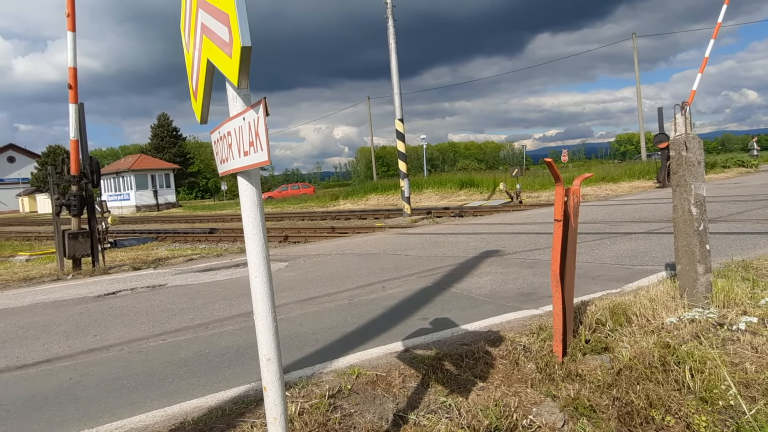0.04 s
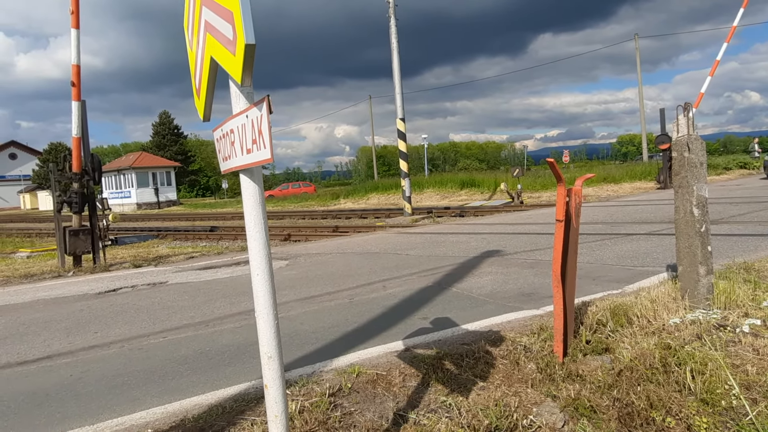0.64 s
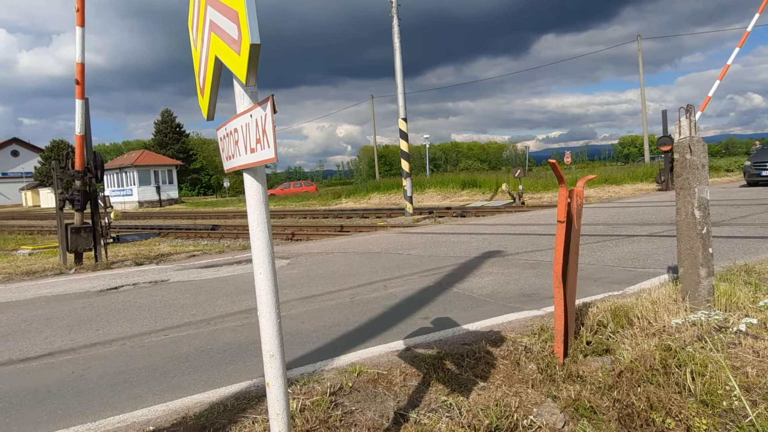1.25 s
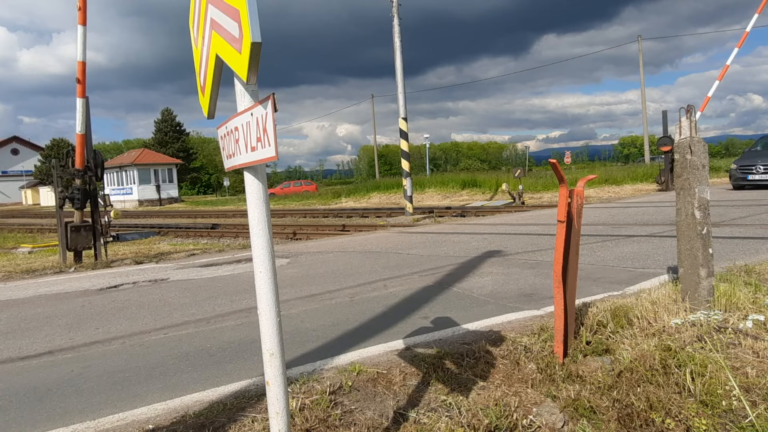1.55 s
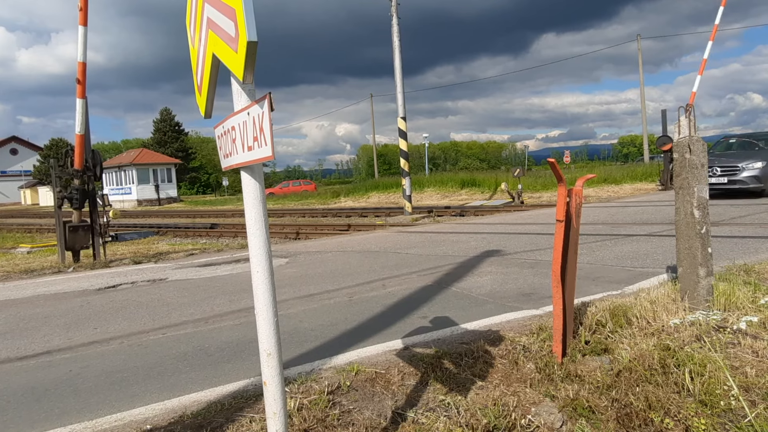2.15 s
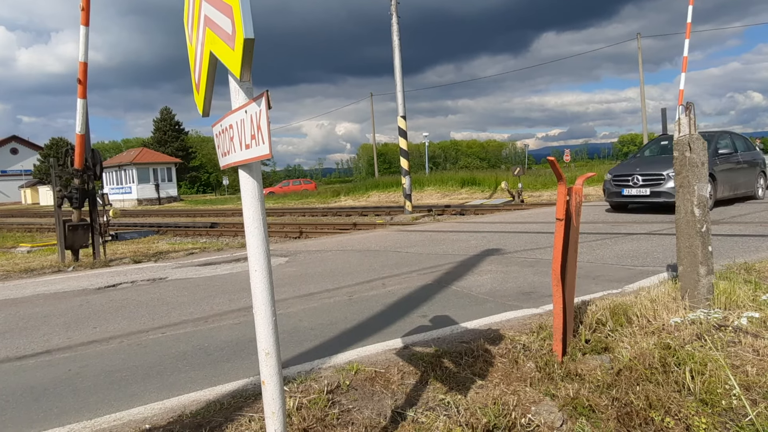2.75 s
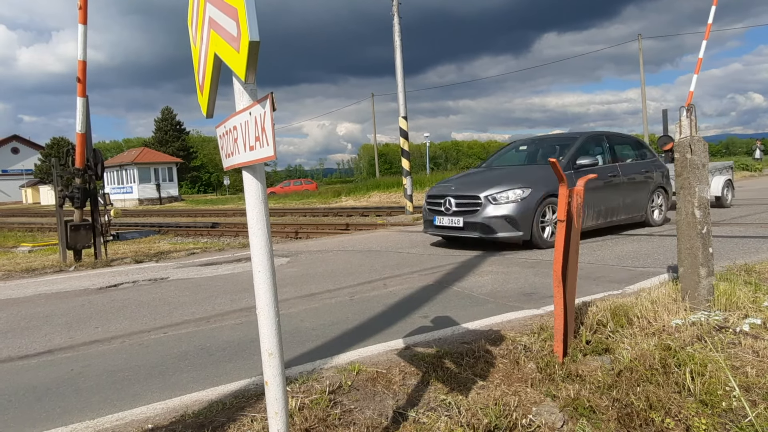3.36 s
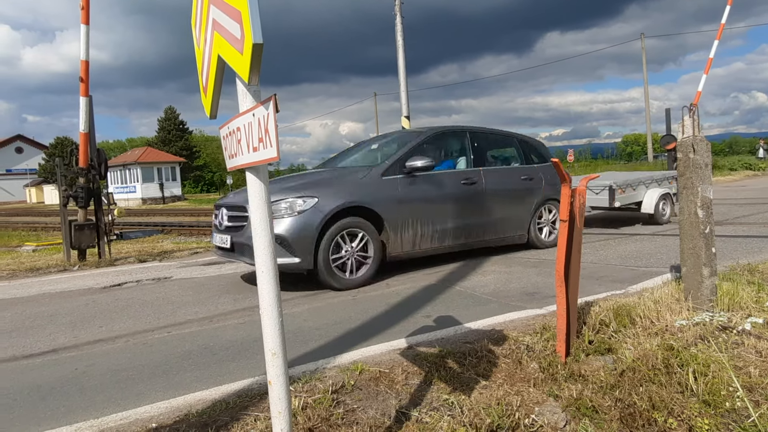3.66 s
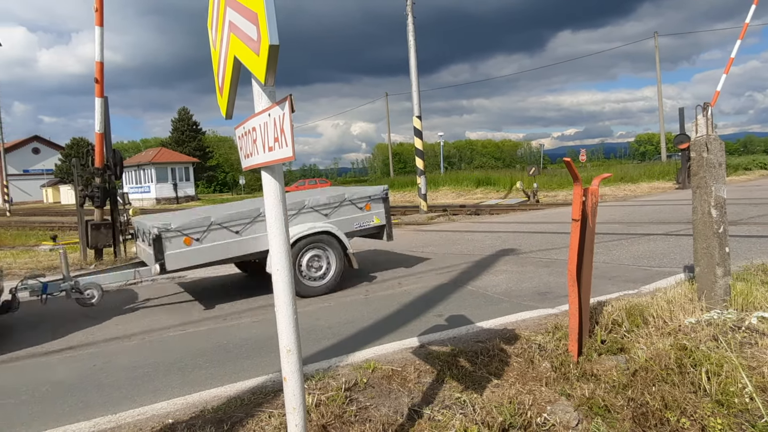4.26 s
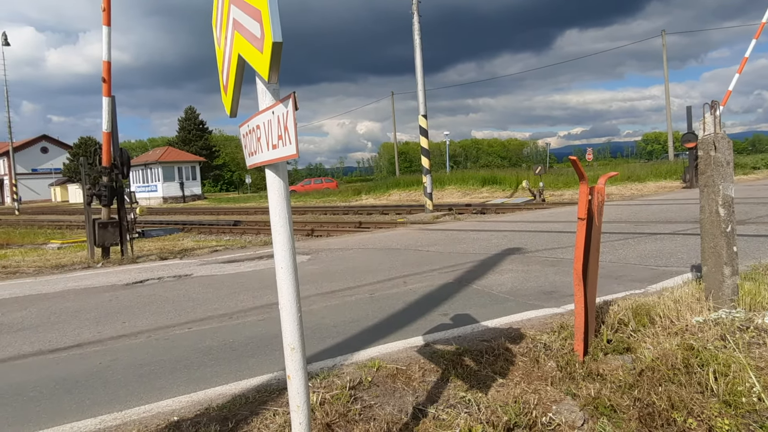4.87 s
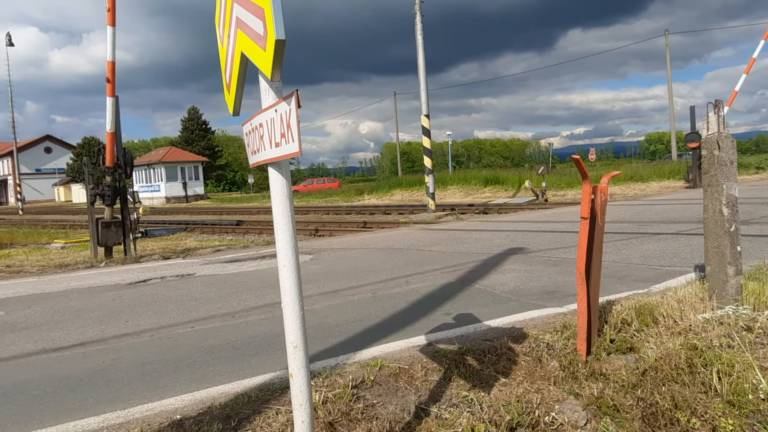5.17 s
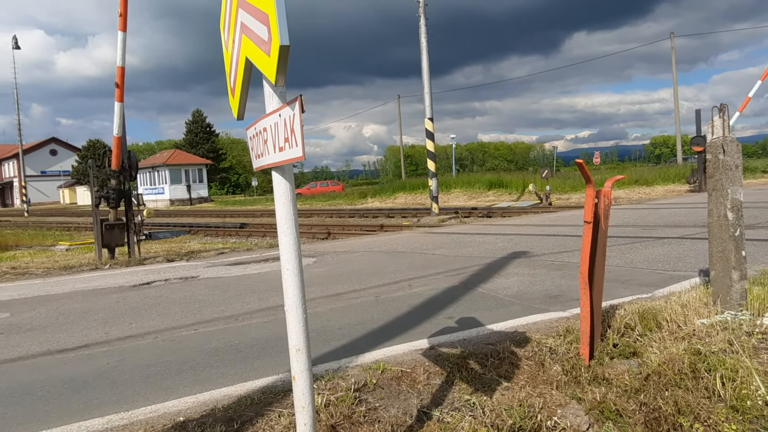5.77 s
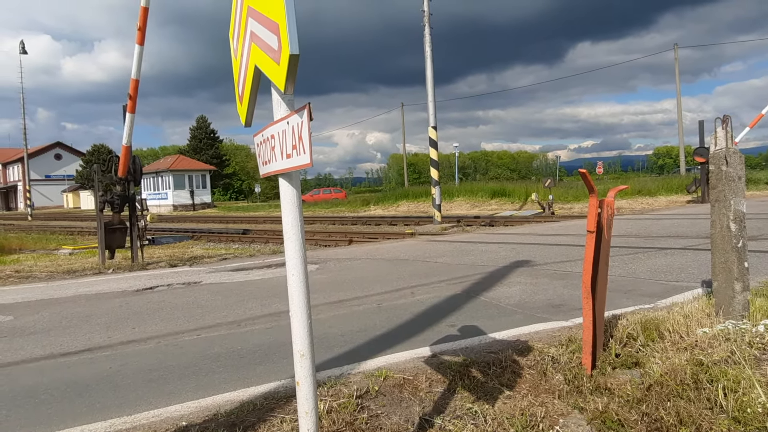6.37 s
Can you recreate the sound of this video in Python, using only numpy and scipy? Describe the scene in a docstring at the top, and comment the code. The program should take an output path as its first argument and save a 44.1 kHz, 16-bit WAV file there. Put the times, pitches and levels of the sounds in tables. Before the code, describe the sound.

Outdoors at a rural railway crossing, distant traffic hums on the left, and a small bird chirps faintly in the first second. From about 1.5 seconds a car towing a light trailer approaches on the right, its engine climbing in pitch until just after 3 seconds, with a thin whistling hiss. From 2.3 seconds the wheels thump repeatedly over rails and joints, while metal panels clank and a chain clinks. Tyre rumble, roar and hiss swell, loudest between about 3 and 4.5 seconds, as car and trailer pass a few metres from the microphone, with strong bumps near 3.7 and 4.3 seconds. The engine eases and the sound fades to the left, with a few last rattles around 5 seconds. At 5.6 seconds a sharp, dry scuffing knock strikes the microphone's left side. A faint swish and a soft, low puff of wind follow just after 6 seconds.

```python
"""A car towing a light trailer bumps over a rural level crossing, right to left, 4.7 m from the microphone.
Its tyres rumble, roar and hiss on the asphalt, the engine pulls, and the front of the car whistles.
The wheels thump on the joints, trailer panels clank and chain clinks. Far off on the left, traffic
hums and a small bird chirps. The microphone has two close ports in one housing; near the end
something scuffs the left one with a sharp knock, and a soft puff of wind follows."""
import sys
import numpy as np
from scipy import signal
from scipy.fft import rfft, irfft, next_fast_len
from scipy.io import wavfile
from scipy.ndimage import map_coordinates

SR = 44100
rng = np.random.default_rng(int(sys.argv[2]) if len(sys.argv) > 2 else 0)


def wav_record(signal):
    """Record a signal, one row per channel, as 16-bit PCM in the file named by sys.argv[1]."""
    frames = np.transpose(np.atleast_2d(signal))
    bounded = np.clip(frames, -1, 1)
    # unit amplitude maps onto the largest positive 16-bit level
    quanta = np.round(bounded * 32767).astype(np.int16)
    wavfile.write(sys.argv[1], SR, quanta)


N = 283122
TIME = np.arange(N) / SR


def amp(db):
    """Decibels to gain."""
    return 10 ** (np.asarray(db) / 20)


def unit(x):
    """Scale to rms 1."""
    return x / np.sqrt(np.mean(x ** 2) + 1e-20)


def along(points, hz):
    """Read (freq_hz, value) points on a log frequency axis."""
    freqs, values = np.transpose(points)
    return np.interp(np.log(hz + 1), np.log(freqs + 1), values)


def curve(points):
    """Read (time_s, value) points at every sample."""
    return np.interp(TIME, *np.transpose(points))


def held(start, end, rise_s, fall_s):
    """0-1 envelope: rises from start, holds until end, then falls."""
    return np.clip(np.minimum((TIME - start) / rise_s, 1 - (TIME - end) / fall_s), 0, 1)


def wobble(rate):
    """A smooth random curve, rate knots a second."""
    return map_coordinates(rng.standard_normal(int(N * rate / SR) + 4), [TIME * rate])


def filtered(x, response):
    """Apply a gain that depends on frequency."""
    n = x.shape[-1]
    padded = next_fast_len(n + 4096, real=True)
    return irfft(rfft(x, padded) * response(np.fft.rfftfreq(padded, 1 / SR)), padded)[..., :n]


def coloured(x, spectrum):
    """Shape a sound by (freq_hz, gain_db) points."""
    return filtered(x, lambda hz: amp(along(spectrum, hz)))


def noise(spectrum, shape):
    """Coloured noise of rms 1."""
    return unit(coloured(rng.standard_normal(shape), spectrum))


def low_cut(x, corner_hz):
    """Take out the deep bass."""
    return signal.sosfilt(signal.butter(4, corner_hz, "high", fs=SR, output="sos"), x)


def add(track, start_s, sound):
    """Mix a sound into a track."""
    part = track[..., round(start_s * SR):][..., :sound.shape[-1]]
    part += sound[..., :part.shape[-1]]


def drive(speed_m_per_s=7.04, closest_m=4.68, abreast_s=4.124, abreast_deg=-34.5):
    """A straight, steady pass: bearing (degrees, right positive), doublings of distance, hidden (0-1)."""
    past = speed_m_per_s * (TIME - abreast_s) / closest_m
    bearing = abreast_deg - np.degrees(np.arctan(past))
    doublings = np.log2(np.hypot(1, past))
    hidden = 1 - held(0.92, 5.62, rise_s=0.39, fall_s=0.42)  # in view on the open stretch of road
    return bearing, doublings, hidden


# Tyre layers from the roadside, by name; levels at the closest point, losses per doubling of distance:
# coming_db, coming_loss_db, going_db, going_loss_db, rough_gain_db, hidden_loss_db
TYRE_LAYERS = {"rumble": (-20, 11.5, -32, 12, 7, 6.5), "tread": (-27.5, 8, -30, 11, 6, 3),
               "hiss": (-34, 10.5, -43.5, 9.5, 5.5, 6.5), "fizz": (-45.5, 10.5, -50, 12.5, 6, 14)}
# Rough stretches, the crossing being the roughest: start_s, end_s, roughness
ROUGH_ROAD = [(1.72, 2.207, 0.6), (2.221, 3.095, 1.18), (4.126, 4.277, 0.52), (4.881, 5.048, 0.37)]
# The wedge between tyre and road throws its roar ahead as each axle nears: start_s, end_s, level_db
WEDGE_FLARES = [(3.374, 3.674, -32), (4.028, 4.272, -36.5)]
# Tyre spectra at the roadside; from behind, the light trailer booms less: freq_hz, level_db
RUMBLE_AHEAD = [(25, -40), (45, -12), (70, -3.5), (105, -1), (160, -2.5), (220, -8), (275, -2), (318, 5),
                (400, -3.5), (500, -9.5), (700, -35), (1000, -69), (2000, -100)]
RUMBLE_BEHIND = [(25, -47), (70, -36), (120, -8), (180, 0.5), (230, -2.5), (320, 4), (410, 2.5), (500, -4),
                 (630, -5), (800, -46), (2000, -100)]
TREAD_AHEAD = [(300, -13), (560, -2.5), (730, -11), (1000, 0.5), (1280, -0.5), (1600, -11), (2200, -12.5),
               (3000, -13), (6000, -82)]
TREAD_BEHIND = [(300, -29), (470, 7.5), (640, 6.5), (800, 1.5), (1050, 2.5), (1500, 4), (1900, -3.5),
                (2800, -9.5), (3700, -13), (4800, -23), (6000, -66)]
GROOVE_HISS = [(1000, -68), (2000, -1.5), (2800, -5), (3400, 0.5), (4500, -2.5), (6300, -4.5), (8000, -8),
               (9000, -14), (10000, -80), (14000, -80)]
GRIT_FIZZ = [(5000, -60), (8500, -20), (10000, -8), (12500, -0.5), (15500, -5.5)]
WEDGE_ROAR = [(700, -33), (1000, 2), (1350, 11), (1900, 0.5), (2700, 0), (3800, -3), (5000, -11.5),
              (7500, -8), (9500, -24), (12500, -18), (15500, -21)]

def tyres(bearing, doublings, hidden):
    """Rough asphalt shakes the tyres; tread blocks slap, air hisses from the grooves and grit crackles."""
    road = wobble(30)
    grit = unit(amp(0.85 * wobble(700)))
    behind = np.clip((10 - bearing) / 80, 0, 1)
    rough = sum(amount * held(start, end, rise_s=0.27, fall_s=0.43) for start, end, amount in ROUGH_ROAD)

    def level(layer):
        coming_db, coming_loss, going_db, going_loss, rough_db, hidden_db = TYRE_LAYERS[layer]
        coming = (1 - behind) * (coming_db - coming_loss * doublings)
        going = behind * (going_db - going_loss * doublings)
        return amp(coming + going + rough_db * rough - hidden_db * hidden)

    def front_to_rear(front, rear, shape):
        return np.sqrt(1 - behind) * noise(front, shape) + np.sqrt(behind) * noise(rear, shape)

    rumble = level("rumble") * amp(1.36 * road) * front_to_rear(RUMBLE_AHEAD, RUMBLE_BEHIND, N)
    tread = level("tread") * amp(1.04 * road) * front_to_rear(TREAD_AHEAD, TREAD_BEHIND, (3, N))
    flare = sum(amp(db) * held(start, end, rise_s=0.14, fall_s=0.24) for start, end, db in WEDGE_FLARES)
    hiss = level("hiss") * noise(GROOVE_HISS, (3, N))
    fizz = level("fizz") * noise(GRIT_FIZZ, (3, N))
    wedge = flare * noise(WEDGE_ROAR, (3, N))
    return rumble, tread + (hiss + fizz + wedge) * grit * amp(0.5 * road)


def firing(hz, orders, colour, unsteady, swell_db=2.7, flutter_db=0.5):
    """Engine harmonics locked to one slightly unsteady shaft, gliding through a fixed colour."""
    phase = 2 * np.pi * np.cumsum(hz * (1 + unsteady * wobble(24.74))) / SR
    out = np.zeros(N)
    for order, db in orders:
        level_db = db + along(colour, order * hz) + swell_db * wobble(8.3) + flutter_db * wobble(45)
        out += amp(level_db) * np.sin(order * phase + rng.uniform(0, 2 * np.pi))
    return np.sqrt(2) * out


# From the roadside, a low engine hum sinking, then the car's engine: time_s, pitch_hz
ENGINE_PITCH = [(0.0, 85.7), (0.8, 58.2), (1.22, 49.2), (1.6, 56.7), (1.85, 68.5), (2.05, 76.5), (2.3, 92),
                (2.55, 113), (2.68, 122.6), (2.82, 128.9), (3.0, 146.9), (3.11, 158.4), (3.21, 163.3),
                (3.38, 136), (3.84, 130.5), (3.95, 146.7), (4.18, 139.5), (4.56, 115.6), (4.85, 90.7),
                (5.06, 83), (5.79, 87), (6.11, 77.3), (6.42, 82.6)]
# The hum swells, then the car's engine pulls: start_s, end_s, gain_db
ENGINE_SWELLS = [(0.2, 0.594, 12), (1.17, 1.7, 16.5), (1.62, 2.453, 19.5), (2.498, 3.004, 26),
                 (2.92, 3.262, 28), (4.577, 5.87, 12)]
# Overtones at the grille: firing_multiple, level_db
OVERTONES = [(2, -1.5), (3, -5.5), (4, -9), (5, -16.5), (6, -24)]
# The engine bay, heard from outside: freq_hz, gain_db
ENGINE_BAY = [(50, 0.5), (85, -5.5), (115, -1.5), (160, -0.5), (215, -3), (250, -16.5), (295, 1), (385, 3),
              (490, -2), (620, -10), (1000, -24)]

def engine(bearing, doublings, coasting_db=-46.5):
    """A low engine hum sinks in pitch; then the car's engine climbs over the crossing and eases off."""
    hz = curve(ENGINE_PITCH)
    swells_db = [db * held(start, end, rise_s=0.094, fall_s=0.25) for start, end, db in ENGINE_SWELLS]
    exhaust = firing(hz, [(1, 0)], ENGINE_BAY, unsteady=0.002)
    overtones = firing(hz, OVERTONES, ENGINE_BAY, unsteady=0.002)
    grille = amp(-1 - 20 * np.clip(-bearing / 60, 0, 1))  # faces away once the car is past
    return amp(coasting_db + np.max(swells_db, axis=0) - 6 * doublings) * (exhaust + grille * overtones)


# Whistling hiss, heard from in front of the car: freq_hz, level_db
WHISTLE_BANDS = [(2000, -37), (2900, -41), (3200, 8.5), (3450, 7), (3800, -27), (4800, -30), (5700, -4),
                 (6400, 2), (7400, -5), (8300, -11), (8600, -6.5), (9200, -56), (12000, -60)]

def whistle(bearing, doublings, hidden, closest_db=-31, beam_deg=25):
    """Narrow bands of hiss, heard while the car faces the microphone."""
    off_beam_db = np.maximum(beam_deg - bearing, 0)  # 1 dB lost per degree
    level_db = closest_db - 11 * doublings - 14 * hidden - off_beam_db
    return amp(level_db + 0.97 * wobble(5)) * noise(WHISTLE_BANDS, (3, N))


# Traffic far off on the left: time_s, level_db
TRAFFIC_LEVEL = [(0, -42.5), (.5, -39), (1, -43), (2, -43), (5.5, -41), (6, -41.5), (6.42, -44.5)]
# Its wash at the microphone: freq_hz, level_db
TRAFFIC_WASH = [(25, -33), (45, -10), (70, 4), (115, -3), (195, -15.5), (280, -6), (400, -13.5), (560, -15),
                (780, -14), (1000, -10.5), (1300, -20.5), (1750, -12), (2600, -19.5), (4000, -31),
                (7000, -40.5), (9500, -60), (15000, -59)]
# One distant engine: firing_multiple, level_db
FAR_ENGINE_ORDERS = [(1, 0), (2, -1), (4, -7)]

def far_traffic(bearing=-68, firing_hz=103.6, rise_hz_per_s=7.2, fade_db_per_s=7.5):
    """A wash of distant traffic; one engine stands out, gathering speed as it fades."""
    wash = amp(curve(TRAFFIC_LEVEL) + 0.81 * wobble(8)) * noise(TRAFFIC_WASH, (3, N))
    hz = firing_hz + rise_hz_per_s * TIME
    drone = firing(hz, FAR_ENGINE_ORDERS, colour=[(100, -6.5), (450, -5)], unsteady=0.0018)
    return outdoors(wash, bearing, spread=0) + amp(-43.5 - fade_db_per_s * TIME) * drone


def chatter(spectrum, length_s, t60_s, contacts_per_s):
    """A blow and a quick run of lighter contacts, each ringing briefly."""
    t = np.arange(SR // 6) / SR
    touching = rng.random(len(t)) < contacts_per_s / SR
    contacts = touching * rng.uniform(0.1, 0.41, len(t)) * np.exp(-(t / length_s) ** 4)
    contacts[0] = 1
    power = np.abs(signal.fftconvolve(contacts ** 2, amp(-120 * t / t60_s))[:len(t)])
    return np.sqrt(power / power.max()) * noise(spectrum, (3, len(t)))


# Rail plates and loose trailer metal, from the roadside: start_s, level_db, length_s, pitch_hz
CLANKS = [(1.554, -41, 0.0072, 2680), (1.572, -38, 0.0069, 1740), (2.381, -28, 0.016, 2180),
          (2.448, -20, 0.016, 1210), (2.456, -12.5, 0.0085, 1150), (2.464, -15, 0.0053, 1120),
          (2.501, -23.5, 0.02, 1130), (2.686, -22, 0.0093, 1230), (2.746, -24, 0.019, 1460),
          (2.856, -16, 0.0061, 1100), (3.047, -28, 0.0046, 1830), (3.072, -19, .011, 1090),
          (3.093, -23, .004, 2620), (3.682, -19, 0.0081, 970), (4.342, -23, 0.033, 550),
          (4.345, -20, 0.022, 1060), (4.767, -25, 0.007, 1270), (5.075, -21, 0.007, 553)]
# Resonances of a struck panel: pitch_multiple, level_db
PANEL_SPECTRUM = [(.27, -18), (.64, -16.5), (.9, 13.5), (1.13, 9.5), (1.45, -3.5), (2.7, -8.5), (4.5, -17),
                  (7.3, -43), (10, -45), (25, -54)]
# Bright chain and grit, from the roadside: start_s, level_db, length_s, pitch_hz, half_width_octaves
CLINKS = [(0.378, -55, 0.036, 6800, 0.38), (.957, -52, .003, 4850, .4), (1.802, -35, 0.0017, 4100, 0.18),
          (1.803, -37, .002, 6450, .04), (1.817, -32, 0.0033, 6430, .04), (1.834, -37.5, .002, 6450, .04),
          (2.456, -36.5, 0.013, 7300, 0.19), (2.617, -50, 0.015, 11700, 0.25),
          (2.74, -36, 0.039, 5200, 0.87), (2.853, -39, .006, 3200, 0.34), (2.969, -34, 0.03, 5500, 0.85),
          (3.088, -40, .005, 12000, .4), (3.68, -14, .0026, 5790, 0.37), (3.737, -25.5, .004, 7000, .5),
          (3.751, -21, 0.0088, 6960, .4), (3.772, -25, 0.0059, 7300, .4), (3.786, -25, 0.0071, 6350, 0.4),
          (3.93, -33, 0.0061, 6950, 0.38), (4.226, -34.5, 0.02, 9000, 0.65),
          (4.58, -36.5, 0.057, 4500, 0.76), (5.07, -41, .004, 5500, 0.35)]
# The band near 10 kHz that the microphone ports swallow: freq_hz, gain_db
PORT_NOTCH = [(8000, 0), (9600, -10), (11300, 0)]

def rattles(doublings, ticks_per_s=3, tick_db=-33.5, tick_hz=5200):
    """Plates and trailer panels clank, chain clinks and stray grit ticks at random."""
    out = np.zeros((3, N))
    for start, db, length, hz in CLANKS:
        panel = [(multiple * hz, level) for multiple, level in PANEL_SPECTRUM]
        add(out, start, amp(db) * chatter(panel, length, t60_s=0.022 + 5.9 * length, contacts_per_s=410))
    ticks = []
    for when, softness, pitch in rng.random((round(ticks_per_s * N / SR), 3)):
        db = tick_db - 10 * doublings[int(when * (N - 1))] - 6 * softness
        ticks.append((when * TIME[-1], db, 0.003, tick_hz * 2 ** (pitch - 0.5), 0.35))
    peak = [(-8, -38), (-0.6, 0), (0, 1), (1, -5), (2.5, -32), (16, -45)]  # offset_half_widths, level_db
    for start, db, length, hz, width in CLINKS + ticks:
        band = [(hz * 2 ** (offset * width), level) for offset, level in peak]
        add(out, start, amp(db) * chatter(band, length, t60_s=0.022 + 2 * length, contacts_per_s=1100))
    return coloured(out, PORT_NOTCH)


# A small bird far off on the left: start_s, length_s, start_hz, end_hz, level_db
CHIRPS = [(.553, .018, 5400, 5800, -59), (0.596, 0.014, 5450, 5900, -57), (.877, 0.023, 5800, 5500, -61),
          (6.093, .4, 7280, 7650, -73)]

def bird(bearing=-49, waver=0.031):
    """Thin, wavering glides: short chirps and one long rising whistle."""
    out = np.zeros(N)
    for start, length, start_hz, end_hz, db in CHIRPS:
        progress = np.clip((TIME - start) / length, 0, 1)
        hz = (start_hz + (end_hz - start_hz) * progress) * (1 + waver * wobble(400))
        tone = np.sqrt(2) * np.sin(2 * np.pi * np.cumsum(hz) / SR)
        out += amp(db) * np.sin(np.pi * progress) * tone
    return ports(out, bearing)


# Wheels on joints and rails, metres away: start_s, level_db, rebound_gain_db, brightness_db_per_octave
JOINT_HITS = [(2.327, -26, -18, 4), (2.381, -23, -2.5, -7), (2.415, -27, -5, -2), (2.775, -21, -12, 6),
              (3.083, -14, -7, 0), (3.112, -19, -7, 2), (3.155, -15, -3, -9), (3.184, -16.5, -11, 5),
              (3.229, -15.5, -26, 7), (3.398, -20, -0.5, -4), (3.425, -22, 2, -2.5),
              (3.538, -19.5, -17, -1), (3.679, -11.5, -0.5, -2), (3.757, -16, -2, 5.5),
              (3.908, -24.5, -19, -1), (3.943, -23, -13, -5.5), (3.969, -27, -21, 0), (4.11, -32, -28, 12),
              (4.219, -36, -12, -13), (4.315, -19, -3, 1), (4.333, -13.5, -9, 0), (4.356, -8.5, -1.5, 1.5),
              (4.563, -18, -10, -3.5), (4.601, -22, -4, -2), (4.971, -29, 0, 14), (5.076, -30.5, -14, 10)]
# Wheel and body modes: pitch_hz, level_db, t60_s
BODY_MODES = [(136, -8.5, 0.058), (177.5, -3.5, 0.074), (203.9, -6.5, 0.028), (297.5, 3.5, 0.063),
              (355.8, -3.5, 0.067), (400.6, -3.5, 0.054), (486, -9, 0.061), (603, -16, 0.042)]
# The suspension taking a dip: start_s, level_db, pitch_hz
SUSPENSION_DIPS = [(2.498, -8, 72), (3.02, -5, 77.6), (3.08, -9, 92), (3.691, -21, 88), (3.768, -16, 80),
                   (4.566, -18.5, 122)]

def thumps(rebound_s=0.019, attack_s=0.0016, blow_s=0.02, dip_t60_s=0.12):
    """Each joint sets wheel and body ringing, and again as the wheel lands; the deeper dips boom."""
    out, t = np.zeros(N), np.arange(SR // 4) / SR
    hz, level, t60 = np.transpose(BODY_MODES)[:, :, None]
    for start, db, rebound_db, brightness in JOINT_HITS:
        for delay, gain_db in [(0, 0), (rebound_s, rebound_db)]:
            detune, strength, phase = rng.standard_normal((3, len(BODY_MODES), 1))
            mode_db = level + brightness * np.log2(hz / hz[0]) + 2 * strength
            modes = np.sin(2 * np.pi * hz * (1 + 0.044 * detune) * t + 0.98 * phase)
            ring = np.sum(amp(mode_db - 60 * t / t60) * modes, axis=0)
            ring *= 1 - np.exp(-t / attack_s)
            add(out, start + delay, amp(db + gain_db) * ring / np.std(ring[t < blow_s]))
    out = low_cut(out, corner_hz=100)
    for start, db, boom_hz in SUSPENSION_DIPS:
        envelope = amp(db - 60 * t / dip_t60_s) * (1 - np.exp(-t / 0.0035))
        add(out, start, envelope * np.sin(2 * np.pi * boom_hz * t))
    return low_cut(out, corner_hz=55)


# The asphalt between car and microphone scatters the treble: freq_hz, gain_db
ASPHALT_BOUNCE = [(3200, -0.5), (6000, -8)]

def road_reflection(x, doublings, strength=0.44, abreast_lag_ms=0.56, from_s=4.59, rise_s=0.6):
    """Once the trailer is past, a bounce off the bare road cuts notches that rise as it draws away."""
    lag = abreast_lag_ms * 2 ** (-0.18 * doublings) * SR / 1000
    share = strength * np.clip((TIME - from_s) / rise_s, 0, 1)
    bounce = np.array([np.interp(np.arange(N) - lag, np.arange(N), row) for row in x])
    return (x + share * coloured(bounce, ASPHALT_BOUNCE)) / np.sqrt(1 + share ** 2)


# Scuffs on the left port, then a soft, low puff of wind: start_s, level_db, length_s, treble_db
PORT_BURSTS = [(5.606, -21.5, 0.0021, -11), (5.608, -32.5, 0.023, 18), (5.632, -16.5, 0.0085, 1),
               (5.638, -10, 0.027, -5.5), (5.665, -17, 0.012, -9), (6.342, -37, 0.042, -65)]
# The colour of those bursts at the port: freq_hz, level_db
PORT_SPECTRUM = [(25, -40), (60, -9.5), (160, -4.5), (290, 1.5), (550, -4), (1000, -8), (2000, -17.5),
                 (4000, -24), (6500, -29.5), (9000, -52), (12000, -36), (15500, -39)]
# A soft swish just beside it: start_s, end_s, level_db
SWISHES = [(6.068, 6.137, -46.5)]
# The sound of that swish: freq_hz, level_db
SWISH_SPECTRUM = [(1000, -22), (2900, 10.5), (5000, 2), (7000, -4), (9000, -15), (11000, -1), (13000, 5),
                  (15500, -5)]

def scuffs_and_wind(edge_s=0.0016, release_s=5.676, swing_hz=76, swing_t60_s=0.081):
    """Abrupt, dry scuffs on the left port, a low swing on release, a swish, then a low puff of wind."""
    out, t = np.zeros(N), np.arange(SR // 10) / SR
    for start, db, length, treble_db in PORT_BURSTS:
        colour = [(hz, level + treble_db * np.clip(np.log2(hz / 200) / 3, 0, 1))
                  for hz, level in PORT_SPECTRUM]
        gate = np.clip(t / edge_s, 0, 1) * np.clip((length + edge_s - t) / edge_s, 0, 1)
        burst = gate * noise(colour, len(t))
        add(out, start, amp(db) * burst * np.sqrt(length * SR / np.sum(burst ** 2)))
    add(out, release_s, amp(-17 - 60 * t / swing_t60_s) * np.sin(2 * np.pi * swing_hz * t))
    swish = sum(amp(db) * held(start, end, rise_s=0.0059, fall_s=0.061) for start, end, db in SWISHES)
    out += swish * noise(SWISH_SPECTRUM, N)
    return low_cut(out, corner_hz=55) * amp([[0], [-30]])


def ports(x, bearing, spacing_ms=0.52):
    """Sound reaches the nearer port first; the rows are left and right."""
    lead = np.sin(np.radians(bearing)) * spacing_ms * SR / 2000
    return np.array([map_coordinates(x, [np.arange(N) + side * lead], order=3) for side in (-1, 1)])


# Sound that reaches the microphone unscattered: freq_hz, power_share
DIRECT_SHARE = [(60, 0.93), (350, 0.81), (700, 0.89), (1300, 0.78), (3000, 0.56), (6000, 0.34),
                (9000, 0.073), (14000, 0.071)]
# The housing's shade, for sound from the right and from the left: freq_hz, left_minus_right_db
SHADE_RIGHT = [(250, 14), (600, 22), (850, -3.5), (1400, 6.5), (2100, -3), (3000, 1.5), (4500, -2),
               (6500, -4), (8500, -16), (10000, -3), (13000, -8)]
SHADE_LEFT = [(250, -0.5), (600, 4.5), (850, 3), (1400, 3), (2100, 2), (3000, 5.5), (4500, 5), (6500, 7.5),
              (8500, -4.5), (10000, 7), (13000, 7)]

def outdoors(x, bearing, spread):
    """Row 0 arrives from the bearing, rows 1 and 2 from all around; the housing shades both."""
    direct = filtered(x[0], lambda hz: np.sqrt(along(DIRECT_SHARE, hz)))
    scattered = filtered(x[1:], lambda hz: np.sqrt(1 - along(DIRECT_SHARE, hz)))
    # close by, the wheels lie in many directions
    width = spread * np.cos(np.radians(np.clip(2 * (bearing + 20), -90, 90))) ** 2
    diffuse = scattered + np.sqrt(width) * (x[1:] - scattered)
    pair = np.sqrt(1 - width) * ports(direct, bearing) + diffuse

    def shade(table, hz):
        gains = amp(np.outer([0.5, -0.5], along(table, hz)))
        return gains / np.sqrt(np.mean(gains ** 2, axis=0))

    from_right = filtered(pair, lambda hz: shade(SHADE_RIGHT, hz))
    from_left = filtered(pair, lambda hz: shade(SHADE_LEFT, hz))
    on_right = np.clip((bearing + 55) / 72, 0, 1)
    return on_right * from_right + (1 - on_right) * from_left


def scene():
    """Car and trailer pass from right to left in front of the roadside microphone."""
    bearing, doublings, hidden = drive()
    rumble, roar = tyres(bearing, doublings, hidden)
    bass = thumps() + rumble + engine(bearing, doublings)
    # bass from the right reaches both ports together; it is a little louder in the left one
    bass = ports(bass, np.minimum(bearing, 0), spacing_ms=0.54) * amp([[0.7], [-0.7]])
    around = far_traffic() + bird() + scuffs_and_wind()
    bright = road_reflection(roar, doublings) + whistle(bearing, doublings, hidden) + rattles(doublings)
    return bass + around + outdoors(bright, bearing, spread=0.73)


def record(dry, top_hz=15830):
    """Peaks round off near full scale; nothing is kept above the band limit."""
    rounded = dry / (1 + np.abs(dry) ** 8) ** (1 / 8)
    return filtered(rounded, lambda hz: hz < top_hz)


dry = scene()
out = record(dry)
wav_record(out)
```